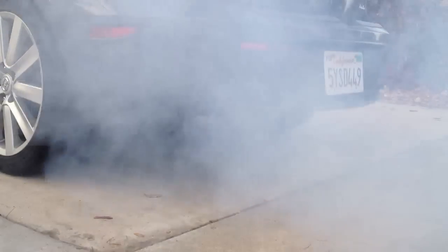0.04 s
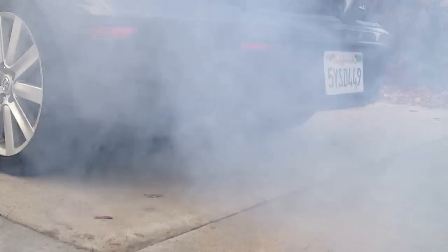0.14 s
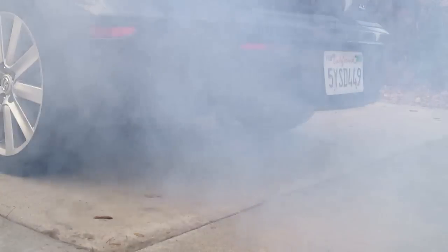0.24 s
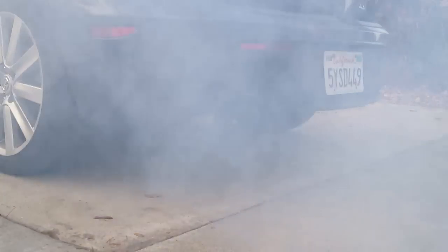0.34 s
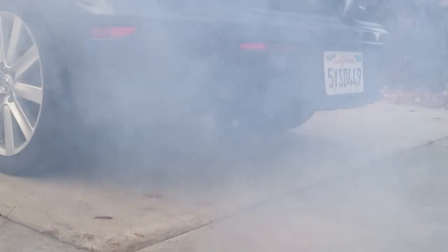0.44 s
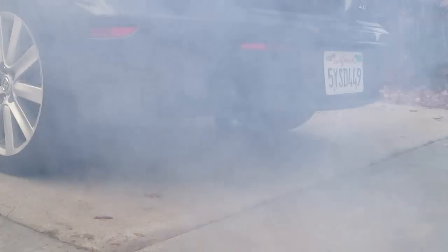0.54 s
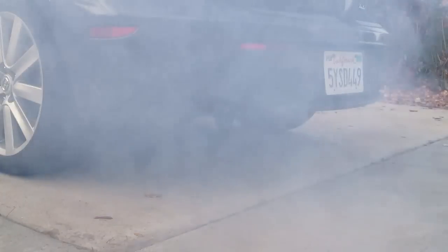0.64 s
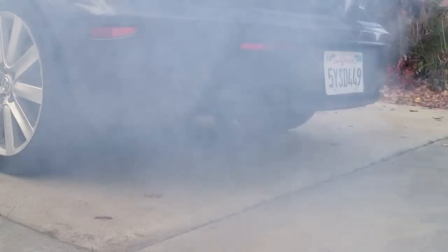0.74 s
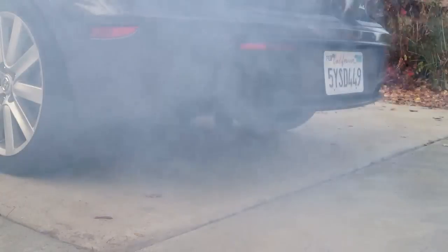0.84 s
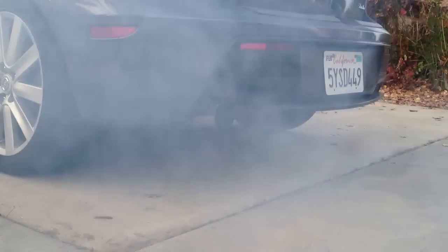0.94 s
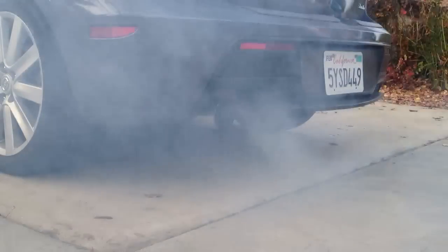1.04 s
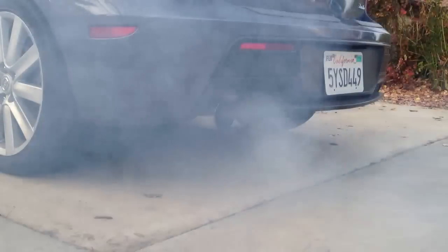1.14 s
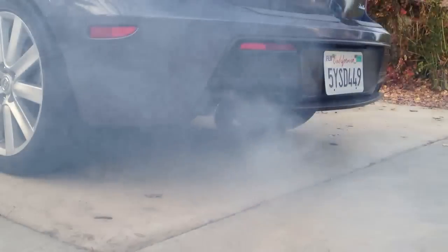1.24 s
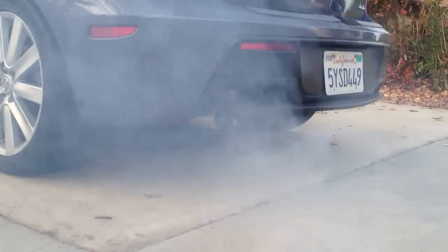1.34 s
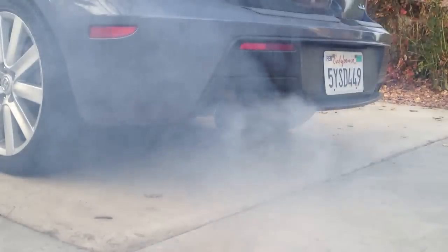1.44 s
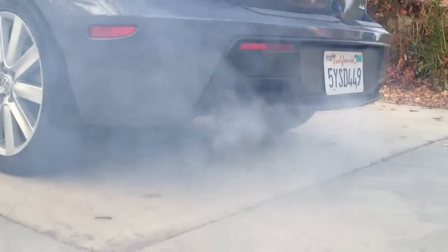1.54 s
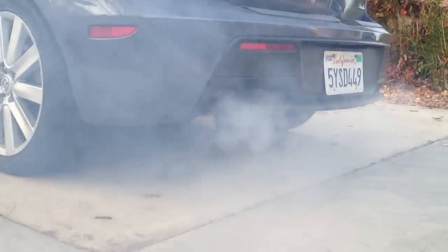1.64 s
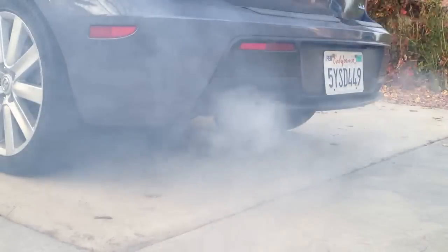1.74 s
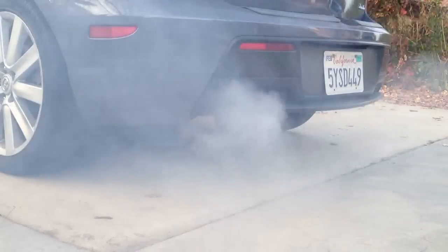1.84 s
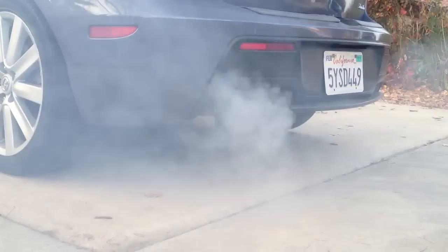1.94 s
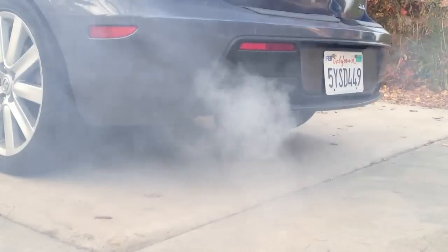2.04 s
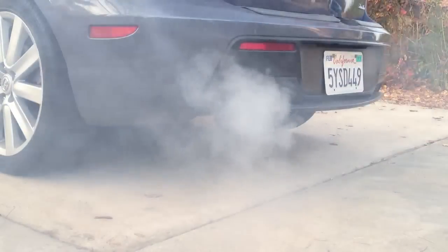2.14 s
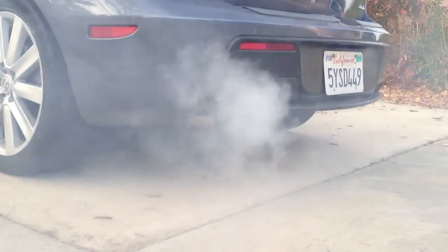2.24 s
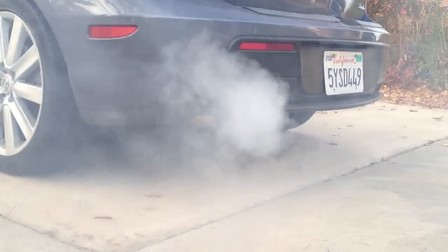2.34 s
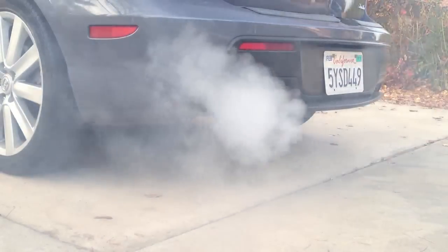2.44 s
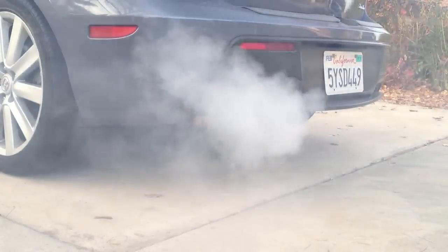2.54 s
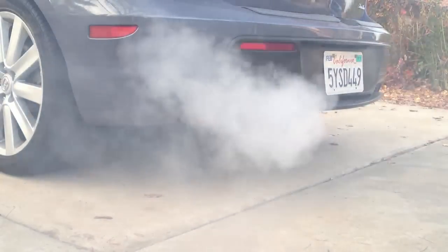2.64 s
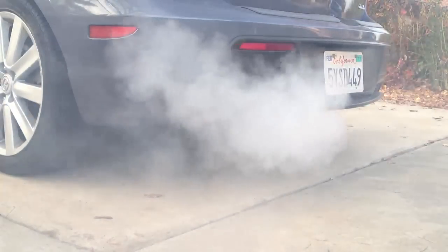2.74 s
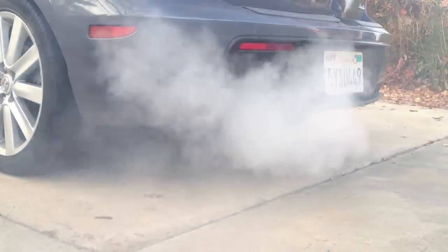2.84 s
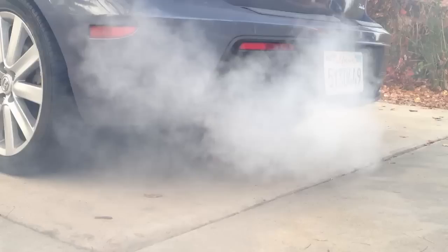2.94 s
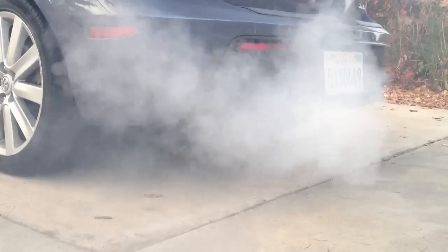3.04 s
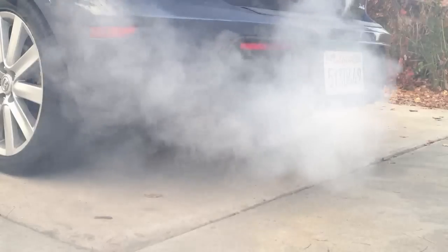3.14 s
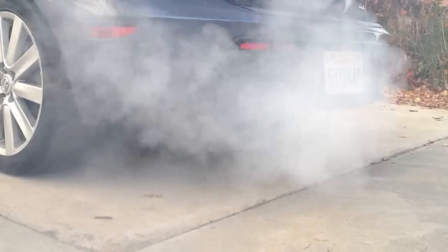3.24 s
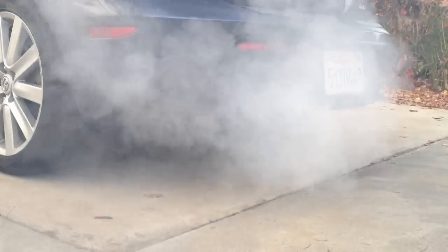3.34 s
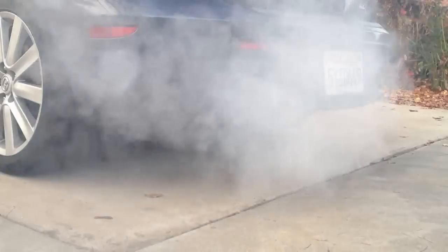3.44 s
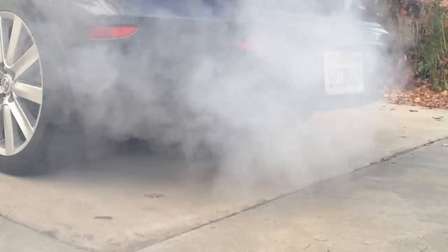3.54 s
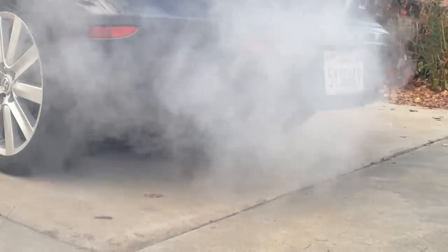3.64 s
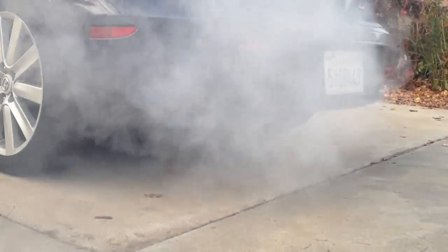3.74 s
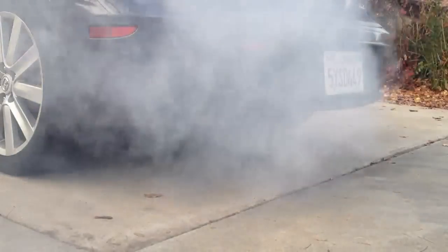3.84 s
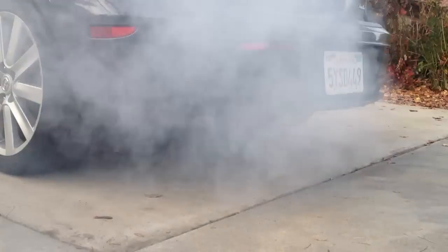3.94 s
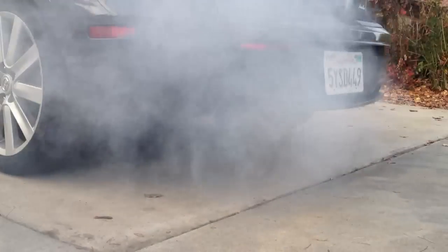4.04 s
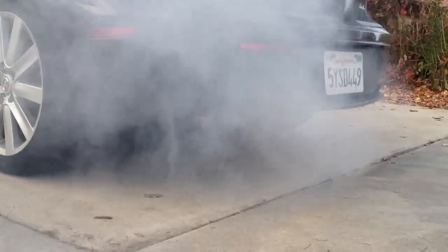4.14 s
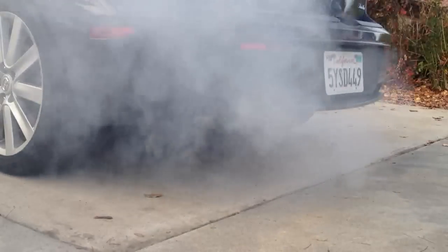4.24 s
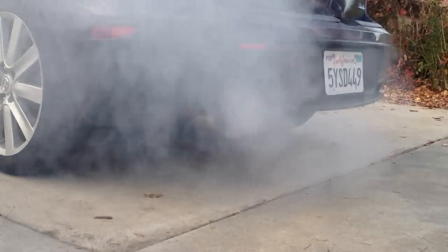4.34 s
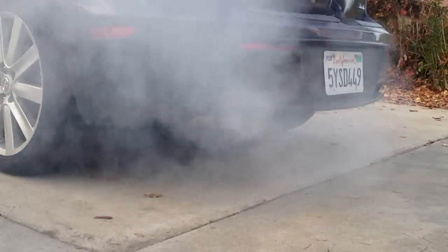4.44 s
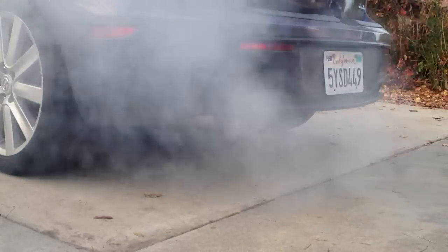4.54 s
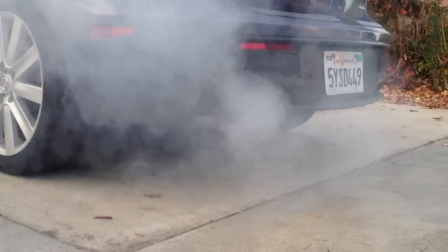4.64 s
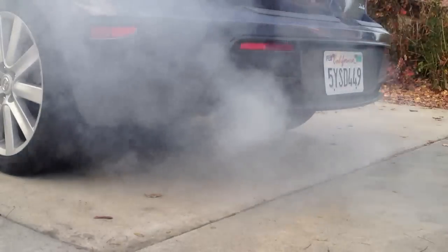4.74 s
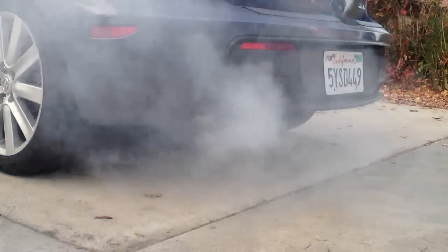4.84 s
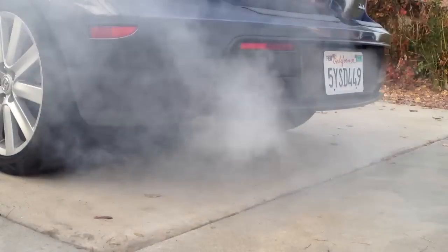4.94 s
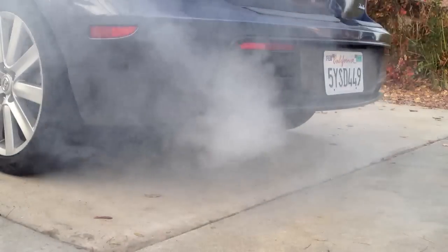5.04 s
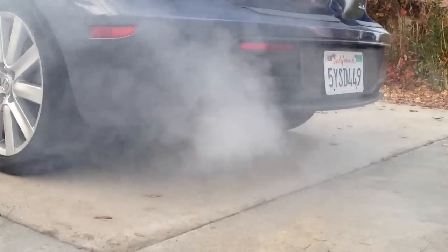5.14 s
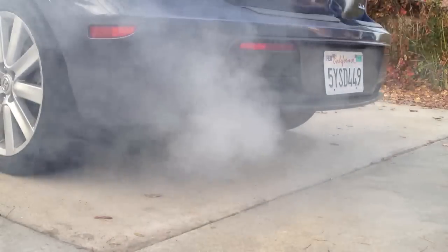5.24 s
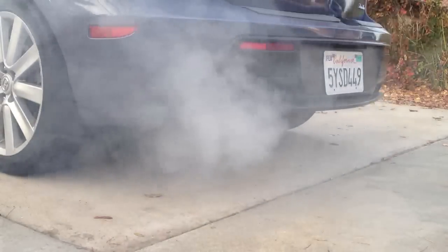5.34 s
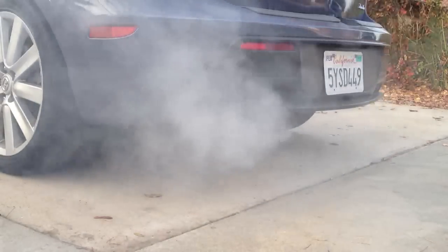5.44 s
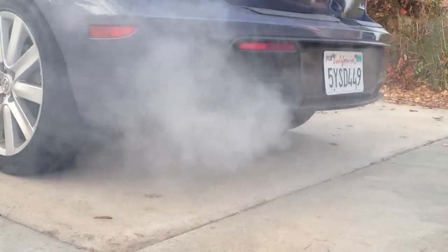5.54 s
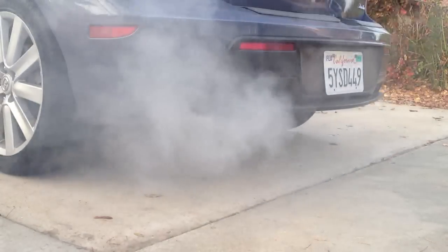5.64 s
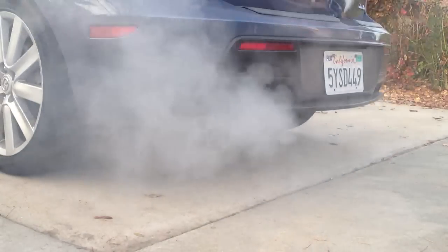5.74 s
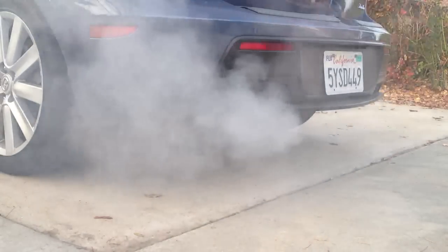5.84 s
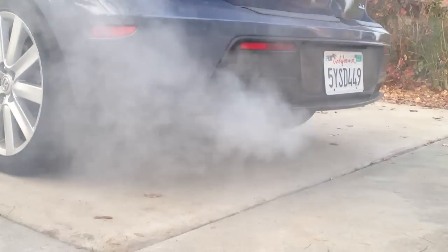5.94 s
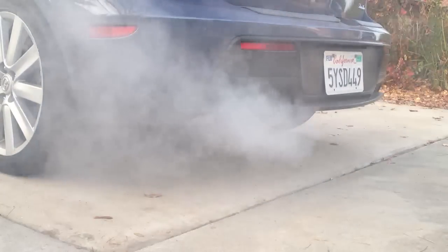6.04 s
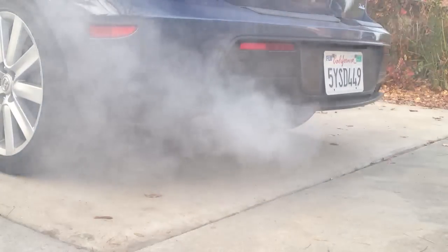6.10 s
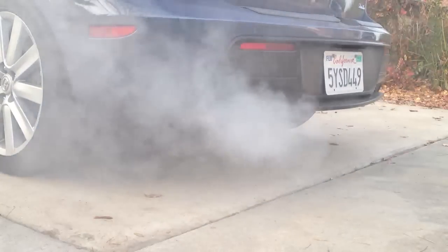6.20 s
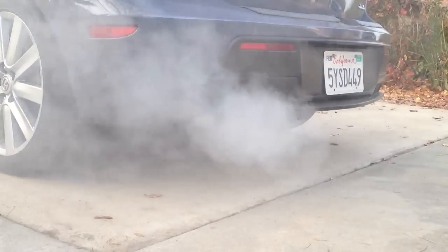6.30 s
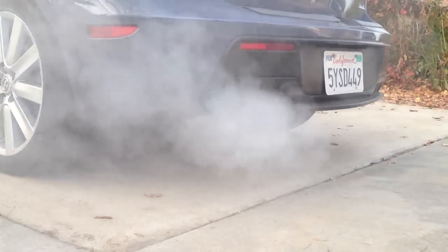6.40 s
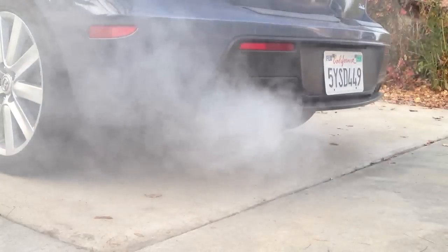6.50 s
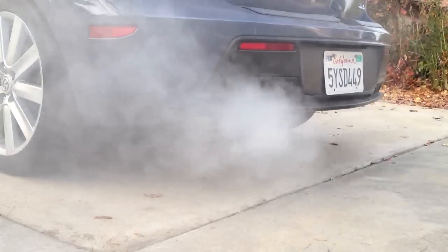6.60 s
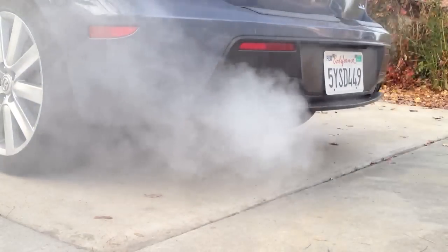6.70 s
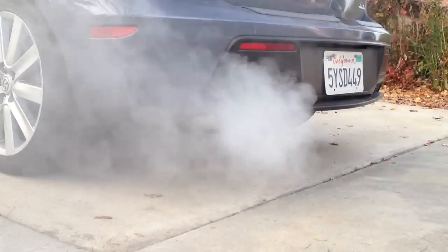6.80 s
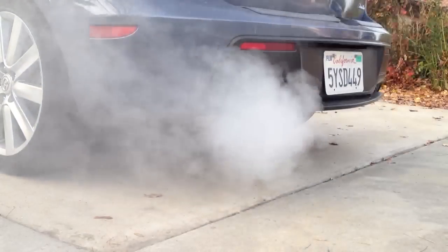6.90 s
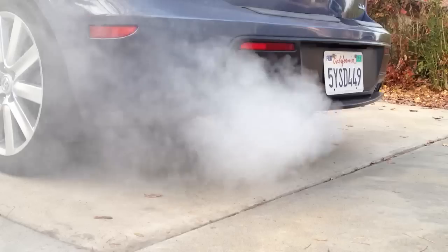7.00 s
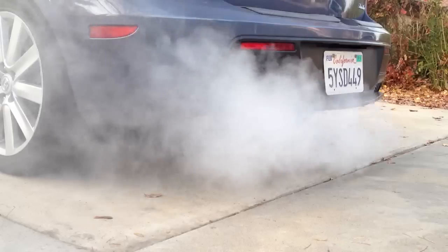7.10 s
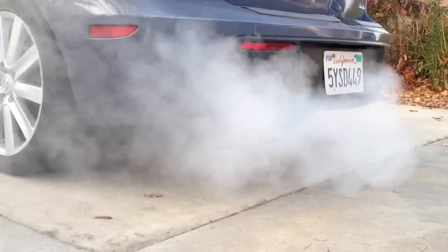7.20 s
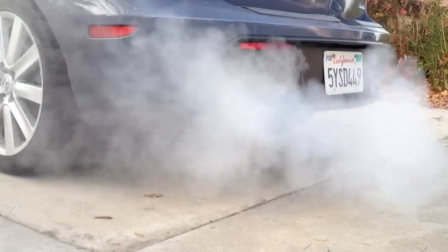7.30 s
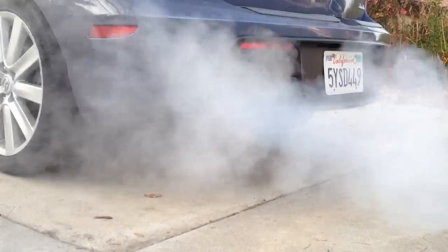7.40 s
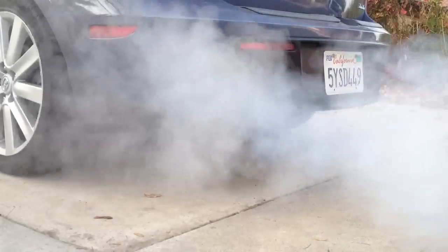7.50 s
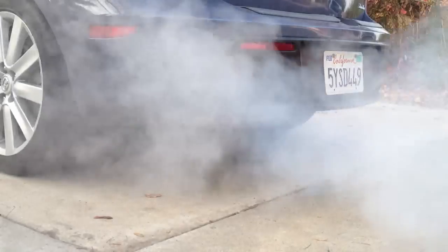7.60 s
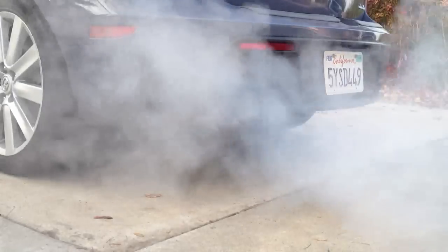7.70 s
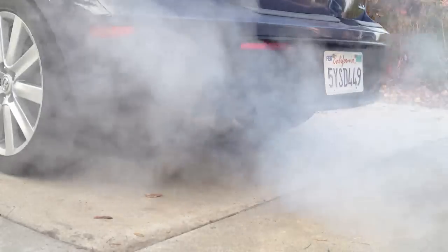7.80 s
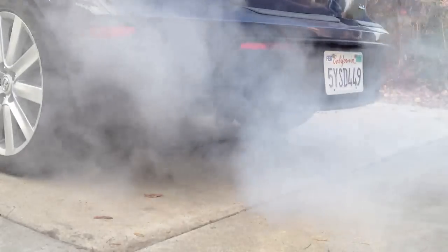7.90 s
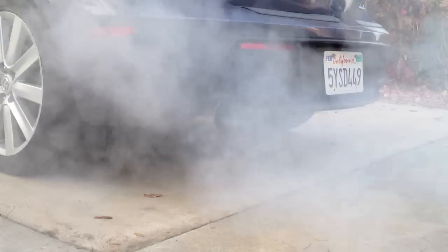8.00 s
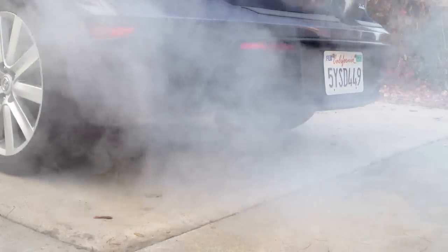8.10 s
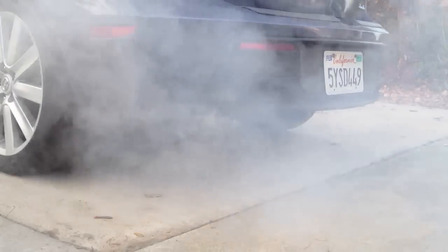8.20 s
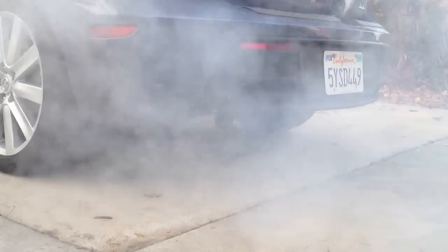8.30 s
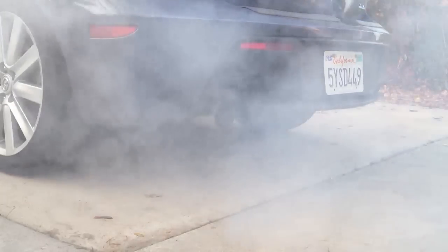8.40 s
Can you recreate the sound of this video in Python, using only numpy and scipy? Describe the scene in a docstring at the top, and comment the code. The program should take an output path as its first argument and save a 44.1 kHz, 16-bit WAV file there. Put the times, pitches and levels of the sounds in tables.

```python
"""First a droning, unevenly barking exhaust winds down: a turbocharged car, heard outdoors near its tailpipe.
It is then blipped, idles and is revved again. Each firing is a click sent through the response of the pipe:
a round thump under load, a ragged bark over a clean drone with the throttle shut. Now and then a firing pops.
Behind that the engine clatters and air rushes, both made of filtered noise that grows with engine speed.
A faint pump whine, two small metallic rattles and a low outdoor noise complete the scene."""
import sys
import numpy as np
from scipy import signal
from scipy.fft import rfft, irfft, next_fast_len
from scipy.io import wavfile
from scipy.ndimage import uniform_filter1d, map_coordinates

SR = 44100
rng = np.random.default_rng(int(sys.argv[2]) if len(sys.argv) > 2 else 0)


def dump(signal):
    """Clip the signal to [-1, 1] and save it as 16-bit WAV at the path in sys.argv[1]."""
    limited = np.clip(np.atleast_2d(signal).T, -1, 1)
    pcm = np.round(limited * 32767).astype(np.int16)
    wavfile.write(sys.argv[1], SR, pcm)


N = 373086

T = np.arange(N) / SR  # time in seconds
SIZE = 2 * next_fast_len(N // 2 + SR // 4)  # length of the Fourier transforms, with room for echoes to die
HZ = np.fft.rfftfreq(SIZE, 1 / SR)

# How the silencer passes each pitch. Each row: frequency in Hz, level in dB.
SILENCER = [(25, -29), (50, -41), (72, -14.5), (90, -8), (115, 2), (150, 3.5), (203, 3.5), (222, -6.5),
            (245, -17), (330, -25.5), (450, -25), (800, -50.5), (2000, -74)]
# Coast-downs with the fuel cut; the first is already under way.
# Each row: time the throttle shuts in seconds, time the fuel returns in seconds.
COASTS = [(-.16, 1.43), (2.87, 3.92), (7.391, 9.0)]
OPEN_S, SHUT_S = 0.097, 0.096  # seconds the throttle takes to open and to shut


def amp(db):
    """Turn decibels into a plain multiplier."""
    return 10 ** (np.asarray(db) / 20)


def unit(x):
    """Scale x to an average (rms) level of 1."""
    return x / np.sqrt(np.mean(x ** 2) + 1e-20)


def steady(x):
    """Even out the slow ups and downs of x, holding its rms level near 1."""
    power = uniform_filter1d(uniform_filter1d(x ** 2, size=5000), size=5000)
    return x / np.sqrt(np.abs(power) + 1e-20)


def colour(points):
    """A response through (Hz, dB) points that never sounds ahead of its cause (minimum phase)."""
    f, db = np.transpose(points)
    level = amp(np.interp(np.log(HZ + 1), np.log(f), db))
    cepstrum = irfft(np.log(level))
    # folding the second half onto the first puts all the sound after the click
    cepstrum[1:SIZE // 2] *= 2
    cepstrum[SIZE // 2 + 1:] = 0
    return np.exp(rfft(cepstrum))


def modes(table):
    """The response of a few ringing resonances, given as (Hz, width Hz, dB), with alternating signs."""
    response = 0
    for k, (centre, width, db) in enumerate(table):
        damping = 1j * HZ * width
        response = response + (-1) ** k * amp(db) * damping / (centre * centre - HZ ** 2 + damping)
    return response


def filtered(x, response):
    """Pass x through a response."""
    return irfft(rfft(x, SIZE) * response, SIZE)[:N]


def noise():
    """Plain white hiss."""
    return rng.standard_normal(N)


def wobble(rate):
    """A smooth random curve through `rate` random points a second."""
    return map_coordinates(rng.standard_normal(int(N * rate / SR) + 4), [T * rate])


def by_speed(table, rate):
    """Read a table at the current firing rate: one curve for each column after the first."""
    hz, *columns = np.transpose(table)
    return [np.interp(rate, hz, column) for column in columns]


def held(start, end, rise, fall):
    """1 between start and end, with ramps centred on both."""
    return np.clip((T - start) / rise + .5, 0, 1) * np.clip((end - T) / fall + .5, 0, 1)


def impulses(times, sizes):
    """A single-sample click at each time."""
    places = np.clip(np.round(np.asarray(times) * SR).astype(int), 0, N - 1)
    return np.bincount(places, sizes, N)


def firings(turn, scatter_db, jitter, uneven=1, spit_db=0, lope_db=0):
    """One click per whole turn, sized by chamber and by chance; chosen spits get a size of their own."""
    # Strength in dB of the six chambers that fire in turn.
    chamber_db = [1.65, -0.14, 0.56, 1, 0.16, -0.54]
    # Times in seconds of the firings that spit hardest.
    spits = [.196, .251, .311, .37, .57, .689, .875, .935, 1.019, 1.221, 1.347, 3.184, 3.333, 3.391, 3.537,
             3.652, 3.771, 6.921, 6.965, 7.568]
    k = np.arange(1, int(turn[-1]) + 1)
    chance = np.clip(rng.standard_normal(len(k)), -2, 2)
    size_db = uneven * np.array(chamber_db)[k % len(chamber_db)] + scatter_db * chance
    size_db = size_db - lope_db * (-1) ** k  # every other firing is harder
    is_spit = np.isin(k, np.round(np.interp(spits, T, turn)))
    size_db = np.where(is_spit, spit_db, size_db)
    times = np.interp(k, turn, T) + jitter * rng.standard_normal(len(k))
    return impulses(times, amp(size_db))


def puffs(kicks, life):
    """A dying burst of turbulence after each click, with the same energy; life is in seconds."""
    keep = np.exp(-1 / (life * SR))
    return signal.lfilter([np.sqrt(1 - keep ** 2)], [1, -keep], kicks) * noise()


def outdoors():
    """The low, constant noise of the open air around the car."""
    # Each row: frequency in Hz, relative level in dB.
    spectrum = [(20, -37), (50, -10.5), (120, 8.5), (220, -2), (300, -9), (1000, -13.5), (2500, -29.5),
                (5000, -37.5), (15000, -38.5)]
    return amp(-46.5) * unit(filtered(noise(), colour(spectrum)))


def pump():
    """A small pump gives a faint whine, slightly unsteady in pitch and level."""
    # One row: middle pitch in Hz, middle level in dB, size of the level waver in dB.
    whine = (975, -66.5, 3)
    hz, db, waver_db = whine
    pitch = hz + 7 * wobble(18)
    return amp(db + waver_db * wobble(5)) * np.sin(2 * np.pi * np.cumsum(pitch) / SR)


def ticks():
    """Loose metal gives a short, bright rattle: a noise burst through a sharp resonance."""
    # Each row: start in seconds, peak level in dB, pitch in Hz, width in Hz, life of the burst in seconds.
    rattles = [(4.654, -44, 4150, 1700, .004), (7.172, -31, 2400, 450, .014)]
    out = np.zeros(N)
    for start, db, hz, width, life in rattles:
        burst = puffs(impulses([start], [1]), life)
        ring = filtered(burst, modes([(hz, width, 0)]) ** 2)
        out += amp(db) * ring / np.abs(ring).max()
    return out


def underbody(x):
    """Sheet metal under the car adds a few narrow resonances to the sound."""
    # Each row: pitch in Hz, width in Hz, level against the direct sound in dB.
    panels = [(855, 22, -29), (1040, 53, 0), (1260, 39, -9), (1796, 34, -37), (2903, 32, 5), (3323, 29, -4),
              (3930, 41, -5)]
    return filtered(x, 1 + sum(modes([panel]) for panel in panels))


def engine_bay(rate, turn, push_db):
    """Valve clatter in step with the firings, and air rushing through turbo and pipe."""
    # Each row: firing rate in Hz, base clatter level in dB, base air level in dB.
    bay_levels = [(27.9, -58.5, -68.7), (29.8, -56, -67), (35.9, -54, -64.5), (47, -49, -60),
                  (58.2, -47, -57.5), (79.6, -42, -51)]
    # Tone of the clatter. Each row: frequency in Hz, relative level in dB.
    clatter_tone = [(60, -38), (250, -2.5), (450, 2.5), (750, 4.5), (1050, 1.5), (1400, 1), (1900, 0),
                    (2550, -1), (3000, -17), (3800, -11.5), (4600, -17), (5200, -21), (9000, -27),
                    (15000, -29)]
    # Tone of the rushing air. Each row: frequency in Hz, relative level in dB.
    air_tone = [(1760, -21.5), (3000, -4.5), (3120, -1.5), (3700, -2.5), (4120, -6), (4500, -2),
                (4940, -7.5), (5290, -9.5), (7820, -10), (10100, -16.5), (12400, -14.5), (13400, -17),
                (15000, -14.5)]
    # Resonances of the air path. Each row: pitch in Hz, width in Hz, relative level in dB.
    whistles = [(2550, 200, -24), (4500, 380, -4.5), (7670, 810, -1), (12150, 150, 0.5)]
    push_clatter = 0.25  # dB of clatter per dB of extra thump
    clatter_db, air_db = by_speed(bay_levels, rate)

    taps = unit(puffs(firings(turn, scatter_db=6.0, jitter=0.0003), life=0.01))
    # the valves tap twice per firing
    valves = unit(puffs(firings(2 * turn, scatter_db=4, jitter=0.0018), life=0.0028))
    clatter = steady(filtered(noise() + .5 * taps + .25 * valves, colour(clatter_tone)))

    air = unit(filtered(noise() + 0.21 * taps, colour(air_tone)))
    whistle = unit(filtered(noise(), modes(whistles)))
    flutter = amp(.5 * wobble(32))
    rush = flutter * (amp(air_db + 3.0) * air + amp(air_db - 9) * whistle)
    return underbody(amp(clatter_db + push_clatter * push_db) * clatter + rush)


def pops():
    """Unburnt fuel lights in the pipe: strong bangs crack, weak ones only thump."""
    # Each row: time in seconds, level in dB.
    bangs = [(1.428, -11), (1.456, -31), (1.511, -20.5), (3.879, -20.5), (4.213, -23), (4.301, -16.5),
             (4.812, -21.5)]
    # Tone of a strong bang. Each row: frequency in Hz, relative level in dB.
    crack_tone = [(25, -34), (60, -22), (110, 4.5), (160, 10), (215, 8), (280, -12.5), (480, -5),
                  (850, -23), (1300, -47), (3000, -68)]
    times, db = np.transpose(bangs)
    sharp = np.interp(db, [-24, -12], [0, 1])  # 0 for a thump, 1 for a crack
    out = np.zeros(N)
    for spectrum, share in (crack_tone, sharp), (SILENCER, 1 - sharp):
        pipe = colour(spectrum)
        peak = np.abs(irfft(pipe)).max()
        out += filtered(impulses(times, share * amp(db)), pipe) / peak
    return out


def throttle():
    """Load (1 burning fuel, 0 coasting) and the extra push of fuel in dB."""
    # Pushes of fuel beyond what idling takes.
    # Each row: start in seconds, end in seconds, extra thump in dB.
    pushes = [(1.374, 1.542, 9.5), (2.34, 2.882, 5.5), (4.19, 4.765, 6), (6.473, 7.424, 9)]
    load = 1 - sum(held(shut, back, SHUT_S, OPEN_S) for shut, back in COASTS)
    push_db = sum(db * held(start, end, OPEN_S, SHUT_S) for start, end, db in pushes)
    return load, push_db


def slack(recovery):
    """1 as the throttle shuts, fading over about `recovery` seconds as the coasting sound builds up."""
    return sum((T > shut - SHUT_S) * np.exp(-((T - shut) / recovery) ** 2) for shut, _ in COASTS)


def exhaust_levels(rate, load, push_db):
    """Thump, bark and firing tone in dB, from engine speed and throttle."""
    # Burning fuel. Each row: firing rate in Hz, base thump in dB, base bark in dB.
    burning = [(29.1, -39, -60.5), (36.8, -34, -57), (41.7, -27.5, -46), (51.4, -26, -44),
               (65.5, -25.5, -37.5), (77.4, -25, -40)]
    # Throttle shut. Each row: firing rate in Hz, base thump in dB, base bark in dB, base firing tone in dB.
    coasting = [(36.5, -24.5, -39.5, -90), (40.5, -27, -39, -85), (46, -30, -36, -80),
                (56.3, -26, -32, -43), (64.3, -24.5, -28, -30.5), (73.4, -22, -25, -27),
                (79, -23.5, -20, -23)]
    push_bark = 1.12  # dB of bark per dB of extra thump
    burn_thump, burn_bark = by_speed(burning, rate)
    coast_thump, coast_bark, firing_db = by_speed(coasting, rate)
    # both sag when the throttle shuts; the bark takes longer to build up again
    thump_sag_db = -4 * slack(0.12)
    bark_sag_db = -14 * slack(0.25)
    thump_db = load * (burn_thump + push_db) + (1 - load) * (coast_thump + thump_sag_db)
    bark_db = load * (burn_bark + push_bark * push_db) + (1 - load) * (coast_bark + bark_sag_db)
    return thump_db, bark_db, firing_db + thump_sag_db


def tailpipe(turn, load, bark_db):
    """Each gas slug rings the tailpipe and shakes the heat shield; gentle ones leave more of a soft puff."""
    # Resonances of the tailpipe. Each row: pitch in Hz, width in Hz, relative level in dB.
    pipe_modes = [(425.3, 36, -3), (525.4, 54, 1), (559, 70.2, -2), (652.5, 130, -14.5), (780, 31, -29)]
    # Resonances of the heat shield. Each row: pitch in Hz, width in Hz, relative level in dB.
    shield_modes = [(850, 120, 8), (2544, 290, -0.5), (2996, 57, -1)]
    # firings are regular under load and throb unevenly while coasting
    regular = firings(turn, scatter_db=1.2, jitter=.0001, spit_db=3)
    throbbing = firings(turn, scatter_db=2.4, jitter=.0001, spit_db=6, lope_db=1.5)
    kicks = load * regular + (1 - load) * throbbing
    turbulence = np.interp(bark_db, [-54, -40, -30], [2.4, 1.1, .5])
    bark = steady(filtered(kicks + turbulence * puffs(kicks, life=.011), modes(pipe_modes)))

    shakes = firings(turn, scatter_db=0.5, jitter=0.00026)
    rasp = steady(filtered(puffs(shakes, life=0.0086), modes(shield_modes)))
    rasp_db = np.interp(bark_db, [-55, -33, -25], [-66, -48, -44]) - 1.5 * load
    return amp(bark_db + 0.94) * bark + amp(rasp_db) * rasp


def exhaust(rate, turn, load, push_db):
    """Round thumps under load; with the throttle shut, ragged pulses over a clean drone."""
    # How the pipe passes each pitch while coasting. Each row: frequency in Hz, level in dB.
    open_pipe = [(25, -20), (55, -19.5), (90, -8), (130, 5.5), (200, 6), (235, -7), (270, -5.5),
                 (330, -21.5), (450, -16.5), (800, -42.5), (2000, -92)]
    # Pipe modes that sound at high speed. Each row: pitch in Hz, width in Hz, relative level in dB.
    howl_modes = [(273, 50.6, 3.5), (407, 62, -2)]
    bark_lead_s = .0048  # the bark leaves the pipe this long before the thump gets through the silencer
    thump_db, bark_db, firing_db = exhaust_levels(rate, load, push_db)

    # each pulse swings both ways as it leaves the silencer: a quarter turn of phase
    thumps = firings(turn, scatter_db=1.4, jitter=.0001, uneven=1.1)
    burning = steady(filtered(thumps, 1j * colour(SILENCER)))

    kicks = firings(turn, scatter_db=1.9, jitter=.00012, spit_db=4)
    pipe = colour(open_pipe)
    roughness = np.interp(rate, [38, 60], [.8, .25])
    ragged = steady(filtered(kicks + roughness * puffs(kicks, life=.018), pipe))
    ragged_db = np.interp(rate, [35.0, 48.5, 64.6, 76], [-3.5, 0.0, -3, -1.5])

    # the drone, at twice the firing rate, keeps step with the pulses; it is strongest at middling speed
    lag = np.interp(2 * rate, HZ, np.unwrap(np.angle(pipe)))
    drone = np.sqrt(2) * np.cos(4 * np.pi * turn + lag)
    drone_db = np.interp(rate, [36.2, 47.0, 58.2, 71.7], [-13, -1.5, -4.5, -16.0])
    coasting = amp(drone_db) * drone + amp(ragged_db) * ragged

    body = amp(thump_db) * (load * burning + (1 - load) * coasting)
    boom = (1 - load) * amp(firing_db) * np.sin(2 * np.pi * turn)

    # fast firings reach the higher pipe modes
    howl = steady(filtered(firings(turn, scatter_db=5.5, jitter=.00006), modes(howl_modes)))
    howl_rise_db = np.interp(rate, [46, 58.6, 67.2, 79.4], [-21.5, -15.5, -6.0, -9.5])
    howl_db = thump_db + howl_rise_db - 8 * load
    return body + boom + amp(howl_db) * howl + tailpipe(turn + rate * bark_lead_s, load, bark_db)


def scene():
    """Speed and throttle drive the exhaust and the engine bay; the other layers are added."""
    # Engine speed before smoothing. Each row: time in seconds, firings a second.
    speed = [(0.0, 78.746), (1.107, 44.347), (1.488, 34.209), (1.789, 36.084), (2.333, 36.965),
             (2.898, 59.014), (3.185, 56.26), (3.902, 34.903), (4.073, 36.343), (4.546, 30.911),
             (4.892, 28.94), (6.101, 28.011), (6.498, 30.545), (6.85, 40.179), (7.353, 76.575),
             (7.626, 76.335), (8.46, 52.932)]
    flywheel_s = .12  # the flywheel rounds off every change of speed over this many seconds
    rate = np.interp(T, *np.transpose(speed))
    rate = uniform_filter1d(rate, size=round(flywheel_s * SR), mode="nearest")
    turn = np.cumsum(rate) / SR  # counts the firings so far
    load, push_db = throttle()
    background = outdoors() + pump() + ticks()
    engine = engine_bay(rate, turn, push_db) + pops() + exhaust(rate, turn, load, push_db)
    return (background + engine)[None]


def record(dry):
    """Cut off all sound from a fixed treble limit upward."""
    top_hz = 15250
    return filtered(dry[0], HZ < top_hz)[None]


dry = scene()
out = record(dry)
dump(out)
```